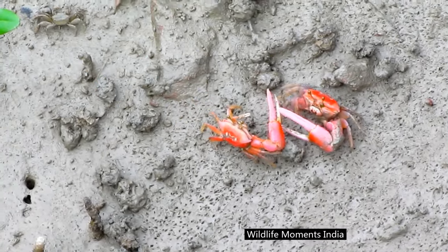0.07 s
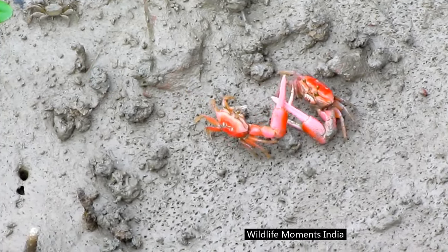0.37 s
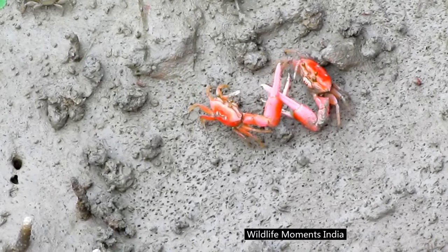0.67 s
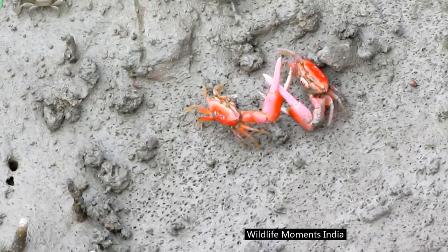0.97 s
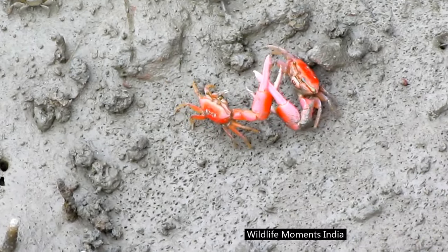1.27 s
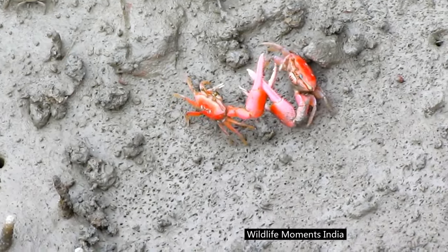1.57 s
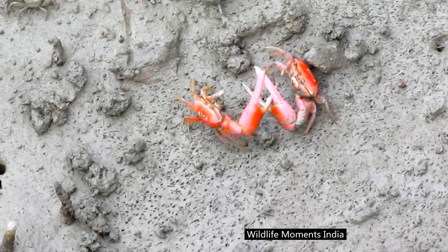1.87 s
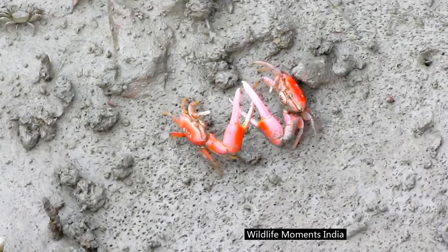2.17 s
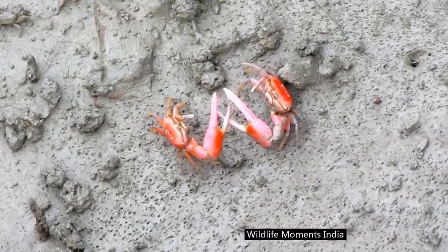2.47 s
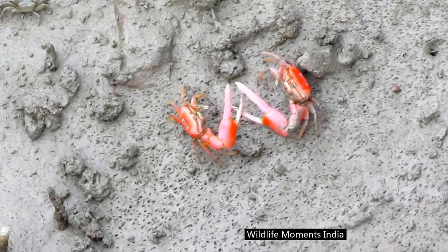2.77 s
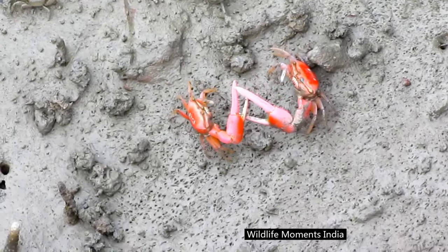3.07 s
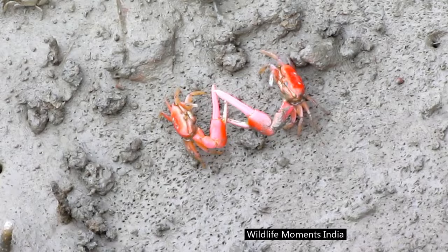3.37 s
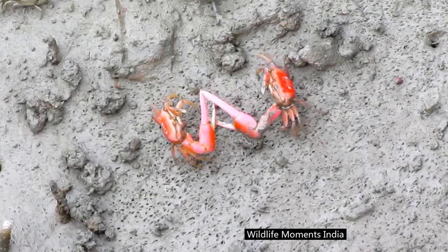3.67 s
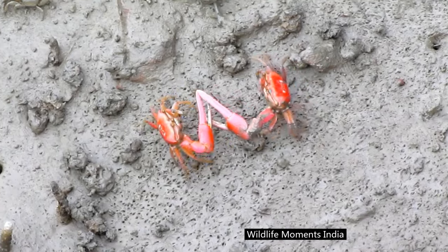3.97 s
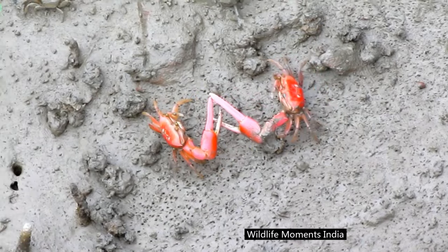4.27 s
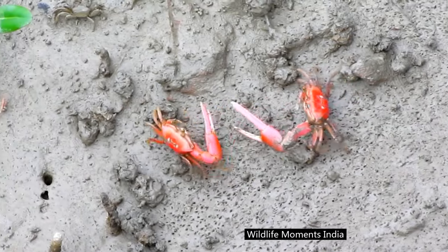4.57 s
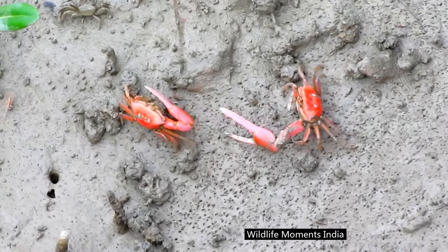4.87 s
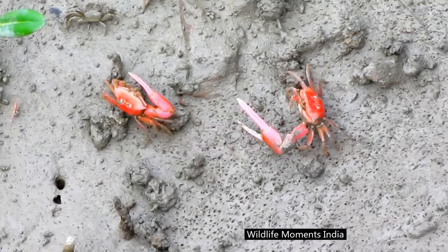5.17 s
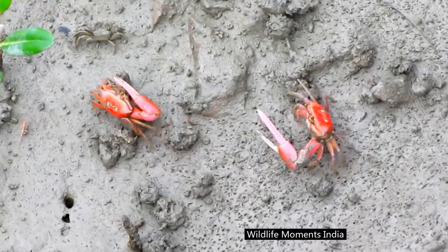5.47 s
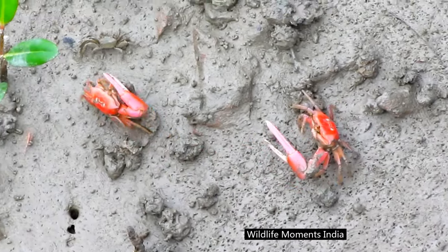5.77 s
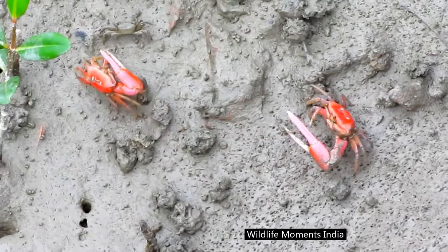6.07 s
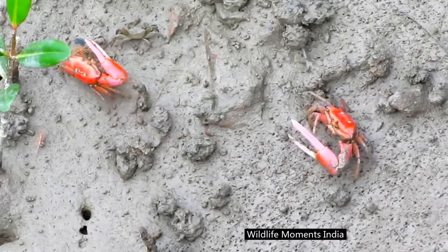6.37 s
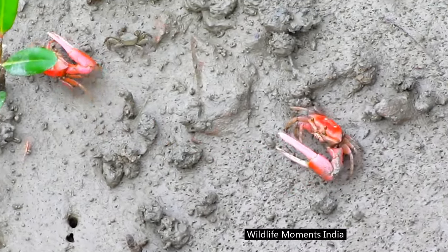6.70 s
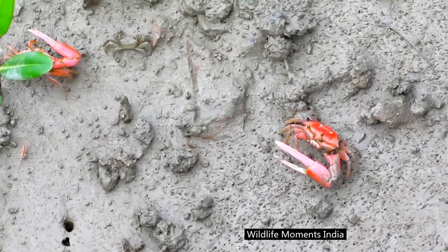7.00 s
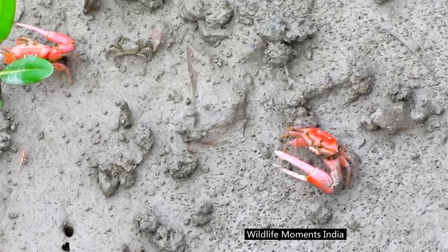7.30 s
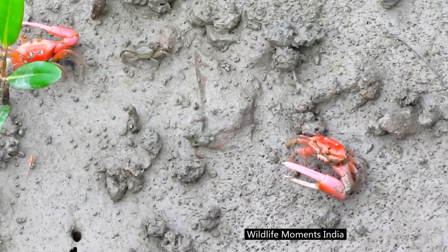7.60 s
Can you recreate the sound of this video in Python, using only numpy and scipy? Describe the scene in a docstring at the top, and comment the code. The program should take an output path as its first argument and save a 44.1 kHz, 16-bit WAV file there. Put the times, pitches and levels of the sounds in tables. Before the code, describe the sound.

Scattered clicks and tiny squelches on a mudflat, with high, pulsing insect chirring and gusts on the microphone that die down halfway.

```python
"""A tidal mudflat. From the start there is a soft hush, with bush crickets stridulating near 8.5 kHz,
while a light wind sweeps eddies over two microphone ports and buffets each with turbulent pressure.
At 0.2 s the nearest cricket begins its swelling phrases. From 0.7 s sharp pops snap out of the wet mud
and excite the resonances of its holes; from 1 s bursting films squelch close by. Halfway the wind dies
down, and faint scratches, then a few hollow plops, join the pops and the crickets."""
import sys
import numpy as np
from scipy import signal
from scipy.fft import rfft, irfft, next_fast_len
from scipy.io import wavfile
from scipy.ndimage import uniform_filter1d, map_coordinates

SR = 44100
rng = np.random.default_rng(int(sys.argv[2]) if len(sys.argv) > 2 else 0)


def to_wav(s):
    """Save 16-bit WAV."""
    ch = np.atleast_2d(s).T  # columns
    pcm = np.round(np.clip(ch, -1, 1) * 32767)  # PCM
    wavfile.write(sys.argv[1], SR, pcm.astype(np.int16))


N = 341334


def amp(db):
    """Amplitude ratio of a level in decibels."""
    return 10 ** (np.asarray(db) / 20)


def unit(x):
    """Normalisation of each channel to rms 1."""
    return x / np.sqrt(np.mean(x ** 2, axis=-1, keepdims=True) + 1e-20)


def along(points, hz):
    """Interpolation of (f/Hz, value) points on a logarithmic frequency axis."""
    f, v = np.transpose(points)
    return np.interp(np.log(hz + 1), np.log(f + 1), v)


def curve(rows):
    """Linear interpolation of (t/s, value) rows to one value per sample."""
    return np.interp(np.arange(N) / SR, *np.transpose(rows))


def wobble(rate, size=N):
    """Smooth random modulation: a spline through `rate` Gaussian knots a second."""
    knots = rng.standard_normal(int(N * rate / SR) + 4)
    return map_coordinates(knots, [np.arange(size) * rate / SR])


def filtered(x, response):
    """Zero-phase filtering: the spectrum of x is multiplied by response(hz)."""
    n = x.shape[-1]
    m = next_fast_len(n + 8192)
    return irfft(rfft(x, m) * response(np.fft.rfftfreq(m, 1 / SR)), m)[..., :n]


def noise(response, shape=(2, N)):
    """Spectral shaping of white noise, at rms 1."""
    return unit(filtered(rng.standard_normal(shape), response))


def band(centre_hz, half_width_hz, size=N):
    """Stereo noise under a single resonance curve, at rms 1."""
    return noise(lambda hz: 1 / (1 + ((hz - centre_hz) / half_width_hz) ** 2), (2, size))


def minimum_phase(gain_db, size=512):
    """Minimum-phase impulse response of energy 1, by folding the cepstrum of gain_db(hz)."""
    cepstrum = irfft(np.log(amp(gain_db(np.fft.rfftfreq(size, 1 / SR)))))
    cepstrum[1:size // 2] *= 2
    cepstrum[size // 2 + 1:] = 0
    impulse = irfft(np.exp(rfft(cepstrum)))
    return impulse / np.linalg.norm(impulse)


def pan(side_db):
    """Gains for an interchannel level difference; side is left minus right throughout."""
    return amp([[side_db / 2], [-side_db / 2]])


def shelter(side_db):
    """Wind shadow: left and right gains that attenuate only the port in the lee."""
    return amp(np.minimum([[side_db], [-side_db]], 0))


def add(track, s, sound):
    """Superposition of a stereo sound on the track from time s, or from 0 if s is negative."""
    part = track[:, max(round(s * SR), 0):][:, :sound.shape[1]]
    part += sound[:, :part.shape[1]]


# Spectrum of the distant air: f/Hz, spectrum level/dB
AIR_SPECTRUM = [(20, 0), (80, -25), (200, 12), (500, 9.5), (1000, 7.5), (2000, 2), (4500, 0), (6500, 1),
                (7500, 0), (9500, -2), (12300, -6), (14500, -16), (16000, -26)]
# Course of its hiss: t/s, relative level/dB
HISS_LEVELS = [(0, -58.5), (.8, -56), (2.3, -53), (2.9, -55), (5.7, -59), (7.74, -58)]


def hush(hiss_gain_db=6.0, low_db=-52.0, split_hz=1700, drift_db=1.0, rustle_db=-67, swing_db=4):
    """Ambient noise: distant air is steady in the bass and drifts in the treble, with a faint rustle."""
    air = noise(lambda hz: amp(along(AIR_SPECTRUM, hz)))
    low = filtered(air, lambda hz: 1 / (1 + (hz / split_hz) ** 4))
    hiss = (air - low) * amp(curve(HISS_LEVELS) + hiss_gain_db + drift_db * wobble(7.9))
    rustle = amp(rustle_db + swing_db * wobble(10)) * band(2660, 998)
    return amp(low_db) * low + hiss + rustle


# Spectrum of the mud's ticks, and of its pops: f/Hz, spectrum level/dB
MUD_SPECTRUM = [(100, -18), (900, -10.5), (1300, -5.5), (2100, 3), (3400, -1), (4400, -5), (6500, -3.5),
                (10500, -7), (12500, -10.5), (14000, -20), (16000, -26)]


def mud_ticks(level_db=-52, spread_db=2.2, per_s=22, t60=0.0062):
    """A Poisson process: draining mud ticks at random instants, each a decaying burst of noise."""
    impulses = (rng.random(N) < per_s / SR) * amp(level_db + spread_db * rng.standard_normal(N))
    decay = amp(-60 * np.arange(SR // 20) / SR / t60)
    envelope = np.abs(signal.fftconvolve(impulses, decay)[:N])
    return envelope * noise(lambda hz: amp(along(MUD_SPECTRUM, hz)))


def far_crickets(chorus_db=-59, low_db=-62.5, onset_s=0.72, period_s=0.68, rise_s=0.021):
    """Incoherent summation merges a chorus into one band; a lower cricket breaks briefly each period."""
    since_break = (np.arange(N) / SR - onset_s) % period_s
    low_cricket = np.minimum(since_break / rise_s, 1) * band(8010, 95)
    return amp(low_db) * low_cricket + amp(chorus_db) * band(8565, 160)


# Phrases of the higher cricket: start t/s, end t/s, level/dB, syllable rate/Hz
HIGH_PHRASES = [(-.04, 0.045, -57, 17), (0.206, 0.905, -53, 18.5), (1.188, 1.884, -53.5, 19),
                (2.1, 2.813, -52, 19), (3.029, 3.746, -53, 14.85), (3.93, 4.649, -50.5, 17),
                (4.899, 5.099, -58, 21.6)]


def high_cricket(pitch_hz=8740, waver_hz=42, rasp_db=-3, edge_s=0.026, depth=0.52):
    """Amplitude modulation divides a slightly wavering, raspy tone into rounded syllables."""
    out = np.zeros((2, N))
    for start, end, db, rate in HIGH_PHRASES:
        t = np.arange(int((end - start) * SR)) / SR
        swell = np.clip(np.minimum(t, end - start - t) / edge_s, 0, 1)
        syllables = 1 - depth * np.cos(np.pi * rate * t + 0.13 * wobble(6.7, len(t))) ** 2
        waver = np.array([wobble(149.8, len(t)), wobble(151.0, len(t))])
        tone = np.sqrt(2) * np.sin(2 * np.pi * np.cumsum(pitch_hz + waver_hz * waver, axis=1) / SR)
        rasp = amp(rasp_db) * band(pitch_hz, 110, len(t))
        add(out, start, amp(db) * swell * syllables * unit(tone + rasp))
    return out


# Turbulent pressure at relative flow speed 1: f/Hz, spectrum level/dB
EDDY_SPECTRUM = [(15, -37), (50, -10), (120, -1), (220, -4), (340, -8), (520, -19.5), (800, -31.5),
                 (1300, -43), (2600, -95), (5000, -120)]


def eddies(speed, size=4 * N):
    """Frozen turbulence: a fixed pressure field is swept past a port, so frequency scales with speed."""
    field = noise(lambda hz: amp(along(EDDY_SPECTRUM, hz)), size)
    pressure = np.interp(np.cumsum(speed), np.arange(size), field)
    # evened out over 20 ms, so that the flow sets the amplitude
    local_power = np.abs(uniform_filter1d(pressure ** 2, size=900))
    return pressure / np.sqrt(local_power + 0.055)


def port(pressure, cutoff_hz=2900):
    """Spatial averaging: eddies smaller than the opening of a port cancel over it."""
    return filtered(pressure, lambda hz: 1 / np.hypot(1, (hz / cutoff_hz) ** 3))


# Light wind between gusts, common to both ports: t/s, relative level/dB
WIND_LEVELS = [(0, -47), (.3, -40), (.6, -47), (1.3, -50), (2, -44), (2.65, -35), (2.95, -45), (3.15, -52),
               (3.45, -47), (3.75, -61.5), (4.8, -60.5), (5.7, -53), (6.4, -63), (7.74, -62)]
# Soft gusts: centre t/s, half-width/s, level/dB, side/dB
GUSTS = [(0.094, .022, -19, -13), (0.199, 0.053, -21, 3), (.262, 0.047, -24, 0), (0.407, 0.056, -19, -3),
         (0.486, 0.053, -20, 1), (0.543, .03, -30, -1), (0.716, .022, -23, 5), (0.771, 0.037, -22, 4),
         (0.833, 0.037, -32, -4), (0.934, 0.042, -32, -1), (1.043, 0.036, -34, 4), (1.162, 0.023, -33, -2),
         (1.226, 0.034, -31, 3), (1.285, .02, -35, -2), (1.406, 0.028, -25, 8), (1.451, 0.032, -34, -2),
         (1.538, 0.029, -22, -1), (1.636, 0.036, -19, 0), (1.71, 0.03, -23, 7), (1.838, 0.059, -30, 6),
         (1.941, 0.028, -25, 8), (2.082, .028, -27, -5), (2.156, 0.043, -25, 3), (2.27, 0.024, -27, 10),
         (2.321, 0.029, -28, -3), (2.486, .025, -25, 3), (2.532, 0.035, -20, 11), (2.568, 0.016, -14, -19),
         (2.68, 0.057, -24.5, -9), (2.779, .04, -26, -3), (2.845, 0.03965, -31, -5),
         (2.929, 0.031, -37, -5.5), (3.026, 0.043, -36, -5), (3.21, 0.027, -22, -10.5),
         (3.25, 0.036, -30, 0), (3.302, 0.02, -31, 6), (3.337, 0.021, -31.5, -7), (3.471, 0.039, -33, -1),
         (3.532, 0.0403, -31.5, 2.5), (3.635, 0.033, -39, 6.5), (3.759, 0.033, -39.5, -9),
         (5.023, 0.041, -30, -25), (5.1, 0.026, -36, -8.5), (5.214, 0.026, -36, -5),
         (5.482, 0.035, -33, -9.5), (5.536, 0.037, -33, -6), (5.611, 0.02, -37, -6),
         (5.692, 0.027, -34, -21), (6.231, 0.053, -45.5, 12), (6.802, 0.04, -35.5, -28),
         (6.873, 0.029, -37, -21), (6.956, 0.037, -33, -23), (7.118, 0.059, -41.5, -20),
         (7.221, 0.023, -35, -21), (7.271, 0.028, -41, -3.5), (7.69, 0.047, -45.5, -11)]


def breeze(wind_gain_db=1.5, wind_swing_db=4.5, gust_swing_db=1.54, speed_power=0.27):
    """Gaussian gusts add in power to an unsteady light wind; flow speed follows strength by a power law."""
    t = np.arange(N) / SR
    light = amp(curve(WIND_LEVELS) + wind_gain_db + wind_swing_db * np.array([wobble(25), wobble(25)]))
    gusts = sum(amp(db) * shelter(side_db) * np.exp(-2 * ((t - s) / half_width) ** 2)
                for s, half_width, db, side_db in GUSTS)
    gusts *= amp(gust_swing_db * np.array([wobble(35), wobble(35)]))
    strength = np.hypot(light, gusts)
    speeds = np.clip(0.7 * (strength / amp(-30)) ** speed_power, 0.44, 1.0)
    return strength * np.array([eddies(speed) for speed in speeds])


# Puffs that hit the ports head-on: t/s, duration/s, level/dB, relative flow speed, side/dB
PUFFS = [(0.087, 0.024, -15, 1.5, -29), (0.166, 0.039, -19, 1.8, -23), (.176, 0.048, -18, 1.2, 8),
         (0.235, 0.14, -22.5, 1.06, -6), (0.298, 0.041, -18, 1.5, 6.5), (0.369, 0.047, -17, 5, -41),
         (0.385, 0.072, -12.5, 2.5, -22), (0.447, 0.075, -20, 3, -22), (0.529, 0.025, -32.5, 2, -5),
         (0.688, 0.02, -33, 4, -16), (0.715, 0.023, -22, 1.8, -9), (0.743, 0.027, -14.5, 3, -29.5),
         (.778, 0.028, -29, 1.3, -18), (0.832, 0.02, -37, 2, -15), (0.91, 0.013, -29, 1.44, -22),
         (.942, 0.012, -30, 1.8, -24), (1.4, 0.011, -31.5, 1.55, 15), (1.604, 0.054, -26, 1.94, 19),
         (1.647, 0.005, -19, 4, 25.5), (1.657, 0.061, -27.5, 1.36, 25), (2.059, 0.02, -24, 2, -22),
         (2.119, 0.055, -27.5, 1.5, 2.5), (2.204, 0.032, -29, 1.32, 1.5), (2.36, 0.027, -28, 2, -8),
         (2.394, 0.028, -16.5, 2, -12), (2.411, 0.023, -15, 1.18, 6), (2.5, .012, -27, 1.4, -1),
         (2.571, 0.0074, -14, 3, -31), (2.58, 0.068, -16, 1.5, -43), (2.63, 0.025, -18.5, 1.5, -39),
         (2.745, 0.04, -18.5, 1.1, -26), (2.787, 0.023, -19, 1.15, -24), (3.213, 0.019, -23, 2, -19)]


def puffs(edge_s=0.00373, rise_share=0.11, flutter_db=2.0, sag_db_per_s=51.5, speed_power=0.452):
    """Turbulent jets rise, flutter, sag and stop; as their strength falls, so do speed and frequency."""
    out, t = np.zeros((2, N)), np.arange(SR // 4) / SR
    for s, length, db, speed, side_db in PUFFS:
        rise = np.clip(t / max(edge_s, rise_share * length), 0, 1)
        release = amp(-8 * np.maximum(t - length, 0) / edge_s)
        flutter = flutter_db * noise(lambda hz: 1 / (1 + (hz / 130) ** 4), (2, len(t)))
        strength = amp(flutter - sag_db_per_s * t)
        speeds = np.clip(speed * strength ** speed_power, 0.3, 7)
        jets = strength * np.array([eddies(v, size=8 * len(t)) for v in speeds])
        add(out, s - edge_s / 2, amp(db) * shelter(side_db) * rise * release * jets)
    return out


# Single tight eddies: t/s, relative peak level/dB, nominal f/Hz, side/dB
SLAPS = [(0.1721, -7, 476, -26), (0.3235, -4, 270, 19), (0.3943, 3.5, 630, -32), (0.426, -3, 452, -30),
         (0.49, -6, 266, -3.5), (1.6407, -6, 440, 24), (2.0657, -11.5, 520, -30), (2.397, -6, 318, -21),
         (2.4177, -8.5, 366, 5), (2.5664, -9.5, 65, -18), (2.570, 1.5, 242, -18), (2.6461, -16, 718.8, -34),
         (3.2159, -12.5, 221, -27)]


def slaps(gain_db=-1, tightness=1.49):
    """A vortex core has low pressure: crossing a port, it gives a sharp dip between soft shoulders."""
    out, t = np.zeros((2, N)), np.arange(SR // 25) / SR
    middle = t.mean()
    for s, db, hz, side_db in SLAPS:
        position = 2 * tightness * hz * (t - middle)
        dip = (3 * position ** 2 - 1) / (1 + position ** 2) ** 3
        add(out, s - middle, amp(db + gain_db) * shelter(side_db) * dip)
    return out


# Phrases of the nearest cricket: start t/s, end t/s, level/dB, mid-phrase f/Hz
NEAR_PHRASES = [(0.224, 0.544, -57, 8240), (1.403, 1.703, -52, 8280), (1.897, 2.322, -47, 8530),
                (2.568, 2.995, -48, 8515), (3.215, 3.673, -47.5, 8500), (3.89, 4.356, -49, 8530),
                (4.759, 5.179, -45.5, 8586), (5.423, 5.938, -46.5, 8534), (6.287, 6.784, -47.5, 8510),
                (7.001, 7.445, -46, 8540), (7.616, 8.051, -45.5, 8600)]


def near_cricket(rise_hz=80, scoop_hz=70, scoop_s=0.09, syllable_hz=16.5, stroke_hz=31,
                 line_hz=50, skirt_hz=200, mode_db=-15, side_db=-2.0):
    """Stridulation: a few separate, lower syllables run on into a rasp of wing strokes, rising in pitch."""
    out = np.zeros((2, N))
    line_shape = lambda hz: 1 / np.hypot(1, hz / line_hz) / np.hypot(1, (hz / skirt_hz) ** 2)
    for start, end, db, pitch_hz in NEAR_PHRASES:
        length = end - start
        t = np.arange(int((length + 0.089) * SR)) / SR
        swell = np.clip(t / 0.028, 0, 1) * np.clip((length + 0.08 - t) / 0.2, 0, 1)
        opening = np.clip(2 - t / 0.12, 0, 1)
        syllables = 1 - 0.7 * opening * np.cos(np.pi * syllable_hz * t) ** 4
        strokes = 1 + 0.1 * np.sin(2 * np.pi * stroke_hz * t + 0.57 * wobble(22.0, len(t)))
        # uneven file teeth broaden the wing's tone into a narrow band
        teeth = noise(line_shape, (2, 2, len(t)))
        glide_hz = pitch_hz + rise_hz * (t / length - 0.5) - scoop_hz * np.exp(-(t / scoop_s) ** 2)
        phase = 2 * np.pi * np.cumsum(glide_hz) / SR
        wing = teeth[0] * np.cos(phase) + teeth[1] * np.sin(phase)
        second_mode = amp(mode_db) * band(8430, 150, len(t))
        add(out, start, amp(db) * swell * syllables * strokes * (wing + second_mode))
    return out * pan(side_db)


# Pops in the mud: t/s, level/dB, tilt/(dB per octave), scatter T60/s, side/dB,
# hole resonance f/Hz, hole gain/dB, low body gain/dB
POPS = [(0.6882, -17.5, 4.5, 0.06, 1.5, 6370, 8.5, 2), (0.7554, -23.5, -6.5, 0.028, -13, 6596, 9, 5),
        (0.9728, -30, 0.5, 0.06, -3, 5770, 6, 7), (1.039, -26.5, 0, 0.043, -7, 2378, 6, 0),
        (1.0570, -18.5, 1.5, 0.033, -4.5, 2270, 0.5, -5), (1.0652, -19, 0.5, 0.04, -5, 2500, 4, -3),
        (1.105, -23.5, 2, 0.034, -3, 7200, 11, 4), (1.117, -22, 2, 0.088, -6, 2806, 6.5, 5),
        (1.358, -32.5, 3, 0.11, 0, 2930, 1, 11), (1.692, -33.5, -3, 0.05, -6, 3370, 6, 8),
        (1.865, -21.5, -3.5, 0.018, -6, 3040, 14.5, -6), (2.3608, -24, 8.5, 0.039, 2, 2500, 22, 0),
        (2.366, -28, 9, 0.037, -6, 5913, 16, 2), (3.0883, -26, 0.5, 0.034, -13, 3080, 12, 6),
        (3.1130, -33.5, 3, 0.079, -7, 3017, 7, 7), (3.2277, -21.5, 3.5, 0.054, -1, 6690, 2, 7),
        (3.317, -32.5, -1.5, 0.027, -12, 3500, 12, 4), (3.659, -36.5, -1, 0.062, -8.5, 2967, 8, 10),
        (3.733, -37.5, 0.5, 0.049, -8, 3380, 13, -2), (4.1761, -28, 1.5, 0.068, -2, 5690, 18.5, 13),
        (4.178, -19, 2.5, 0.039, 0, 10930, 17.5, 10), (4.3846, -27, -1.5, 0.041, -7, 3500, 8, -2),
        (4.526, -37, 11, 0.02, -1, 13700, 6, 0), (4.584, -41, 7, 0.034, 1, 12500, 2, 0),
        (5.121, -38.5, -2, 0.065, -10, 2049, 7, 3), (5.264, -14.5, 1.3, 0.029, -7.5, 5904, 9, -1.5),
        (6.1402, -32.5, -3.5, 0.02, -7, 2952, 9, -2), (6.1502, -32, 2, 0.06, -6, 2070, 5, 19.5),
        (6.3332, -20.5, -3, 0.019, -9, 3490, 10, -7.5), (6.4325, -40, 10, 0.048, -4, 13080, 10, 0),
        (7.6016, -31.5, 2, 0.027, 0, 2234, 9, 10)]


def pops(crack_t60=0.0018, echo_s=0.0014, echo_gain=0.23, lag_s=0.00004,
         scatter_db=-6, far_db=-27, far_t60=0.081, hole_relative_width=0.09, body_hz=960):
    """Impulse excitation: a crack rings its hole, reflects off the mud and scatters from lumpy ground."""
    out, t = np.zeros((2, N)), np.arange(SR // 6) / SR
    echo = echo_gain * (t > echo_s) * amp(-60 * np.abs(t - echo_s) / crack_t60)
    envelope = amp(-60 * t / crack_t60) + echo
    for s, db, tilt_db, t60, side_db, hole_hz, hole_db, body_db in POPS:
        crack = envelope * rng.standard_normal(len(t))
        # the crack reaches the right port just before the left; the scatter differs between them
        direct = np.array([np.interp(t - lag_s, t, crack, left=0), crack])
        tail = np.hypot(amp(scatter_db - 60 * t / t60), amp(far_db - 60 * t / far_t60))
        scatter = tail * rng.standard_normal((2, len(t)))
        hole = lambda hz: hole_db / (1 + ((hz / hole_hz - 1) / hole_relative_width) ** 2)
        body = lambda hz: body_db / (1 + (2 * (hz / body_hz - 1)) ** 4)
        tilt = lambda hz: tilt_db * np.log2(np.maximum(hz, 500) / 4000)
        colour = minimum_phase(lambda hz: along(MUD_SPECTRUM, hz) + hole(hz) + body(hz) + tilt(hz))
        add(out, s, amp(db) * pan(side_db) * signal.fftconvolve(direct + scatter, colour[None], axes=1))
    return out


# Wet squelches: t/s, level/dB, duration/s, side/dB
SQUELCHES = [(0.997, -39, 0.032, -4), (1.046, -41.5, 0.032, -4), (1.053, -40, .005, 0),
             (1.085, -39, 0.043, -4), (1.118, -33.5, 0.0068, -5), (1.133, -38.5, 0.019, -5),
             (1.432, -45.5, 0.049, 4), (1.48, -41, 0.018, 3), (2.294, -49.5, 0.052, 9),
             (2.343, -41, 0.034, 2), (2.448, -38, 0.035, 2), (3.092, -37.5, 0.012, -3),
             (5.29, -51, 0.02, 2)]
# Their spectrum: f/Hz, spectrum level/dB
SQUELCH_SPECTRUM = [(500, -56), (900, 0), (1400, 7), (2400, 1.5), (3500, 1), (5200, 0.5), (7500, -1),
                    (10500, -8.5), (13000, -14), (16000, -37)]


def squelches(grain_db=4, grain_hz=1475):
    """Film rupture: wet mud parts in a quick swell of tiny bursts."""
    out, t = np.zeros((2, N)), np.arange(SR // 6) / SR
    colour = minimum_phase(lambda hz: np.maximum(along(SQUELCH_SPECTRUM, hz), -50))
    for s, db, length, side_db in SQUELCHES:
        age = 3 * t / length
        swell = age * np.exp(1 - age)
        films = unit(amp(grain_db * wobble(grain_hz, len(t))) * rng.standard_normal((2, len(t))))
        add(out, s, amp(db) * pan(side_db) * signal.fftconvolve(swell * films, colour[None], axes=1))
    return out


# Modes of hard-walled holes: t/s, f/Hz, level/dB, T60/s, side/dB
HOLE_MODES = [(1.0659, 2470, -37, .018, -3), (2.361, 2480, -32, 0.026, 2), (5.2645, 2080, -28, .016, -12),
              (5.2645, 3570, -21.5, 0.014, -13), (6.14, 2970, -40, 0.041, -6),
              (6.3335, 1706, -34, 0.028, -7), (6.3335, 3520, -24.5, 0.015, -11),
              (7.6013, 2299, -41, 0.019, -2)]


def hole_rings(attack_s=0.00019):
    """Free decay: one or two strongly damped modes of a hole give some pops a woody note."""
    out, t = np.zeros((2, N)), np.arange(SR // 12) / SR
    attack = 1 - np.exp(-t / attack_s)
    for s, hz, db, t60, side_db in HOLE_MODES:
        add(out, s, amp(db - 60 * t / t60) * pan(side_db) * attack * np.sin(2 * np.pi * hz * t))
    return out


# Faint scratches farther off: centre t/s, half-width/s, level/dB, f/Hz, half-bandwidth/Hz
SCRATCHES = [(3.834, 0.026, -54.5, 3216, 1203), (4.887, 0.032, -55, 3310, 1184),
             (4.951, 0.024, -56, 3380, 996), (5.192, 0.044, -62, 3550, 247.4),
             (5.591, 0.034, -62, 2712, 591), (6.445, 0.037, -56, 2600, 1210),
             (7.344, 0.044, -54.5, 2374, 1096), (7.492, 0.0084, -48.5, 2750, 89.4),
             (7.557, 0.009, -50, 1730, 396)]


def scratches(grain_db=3, grain_hz=216.0, side_db=-3):
    """Friction noise: short grainy scrapes on the mud swell and fade, each in its own band."""
    out, t = np.zeros((2, N)), np.arange(SR // 3) / SR
    middle = t.mean()
    for s, half_width, db, hz, half_width_hz in SCRATCHES:
        grains = unit(amp(grain_db * wobble(grain_hz, len(t))) * band(hz, half_width_hz, len(t)))
        swell = np.exp(-2 * ((t - middle) / half_width) ** 2)
        add(out, s - middle, amp(db) * swell * grains)
    return out * pan(side_db)


# Soft hollow plops: t/s, level/dB, initial f/Hz, T60/s, side/dB
PLOPS = [(5.097, -33, 330.4, 0.052, -13), (6.15, -37.5, 291, 0.046, -1), (7.022, -27.5, 473, .02, -2),
         (7.022, -30.5, 848, 0.014, -2), (7.596, -45.5, 321.5, 0.27, -1.5)]


def plops(attack_cycles=1.15, sag_per_s=1.695):
    """Cavity resonance: a burrow gives a dull note or two that sink a little as they decay."""
    out, t = np.zeros((2, N)), np.arange(SR // 4) / SR
    for s, db, hz, t60, side_db in PLOPS:
        attack = 1 - np.exp(-t * hz / attack_cycles)
        note = np.sin(2 * np.pi * np.cumsum(hz * np.exp(-sag_per_s * t)) / SR)
        add(out, s, amp(db - 60 * t / t60) * attack * pan(side_db) * note)
    return out


def scene():
    """Linear superposition of mud, crickets, ambient noise and the separate wind at each port."""
    mud = pops() + hole_rings() + squelches() + scratches() + plops()
    crickets = near_cricket() + high_cricket() + far_crickets()
    wind = port(breeze() + puffs() + slaps())
    ambience = (hush() + mud_ticks()) * pan(-0.29)
    return ambience + crickets + wind + mud


def record(dry, band_limit_hz=16100):
    """Soft saturation in the camera rounds the highest peaks; nothing passes above its band limit."""
    rounded = dry / (1 + np.abs(dry) ** 6) ** (1 / 6)
    return filtered(rounded, lambda hz: hz < band_limit_hz)


dry = scene()
out = record(dry)
to_wav(out)
```